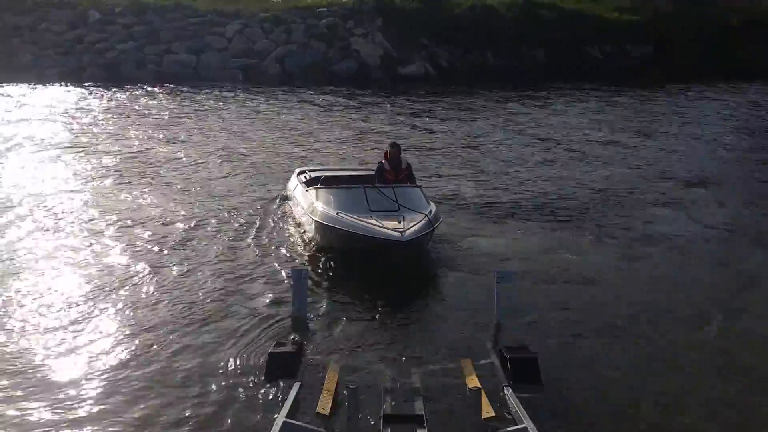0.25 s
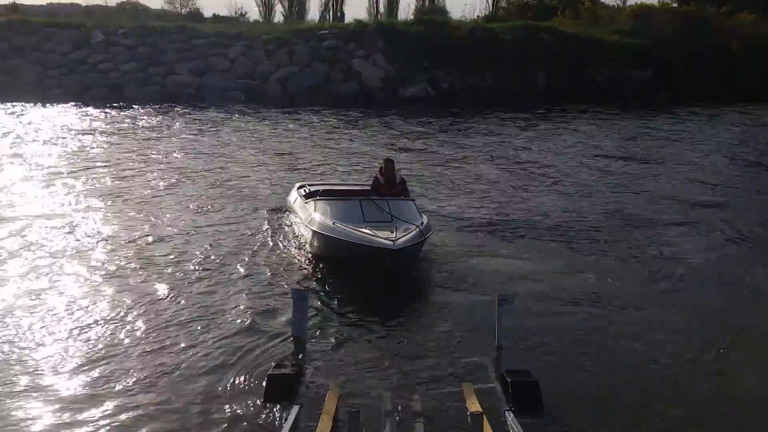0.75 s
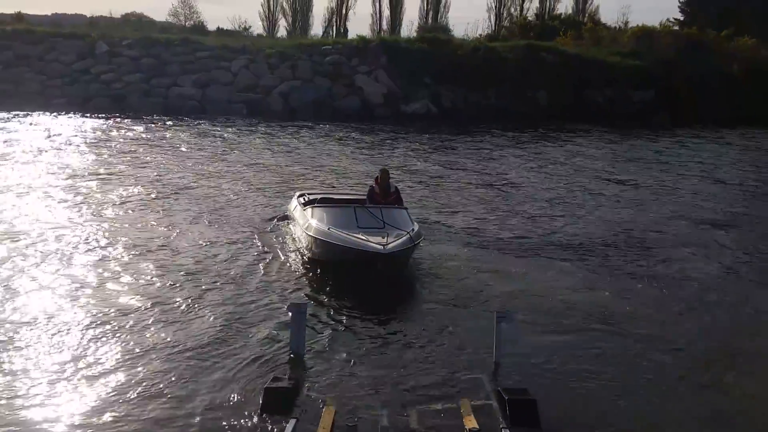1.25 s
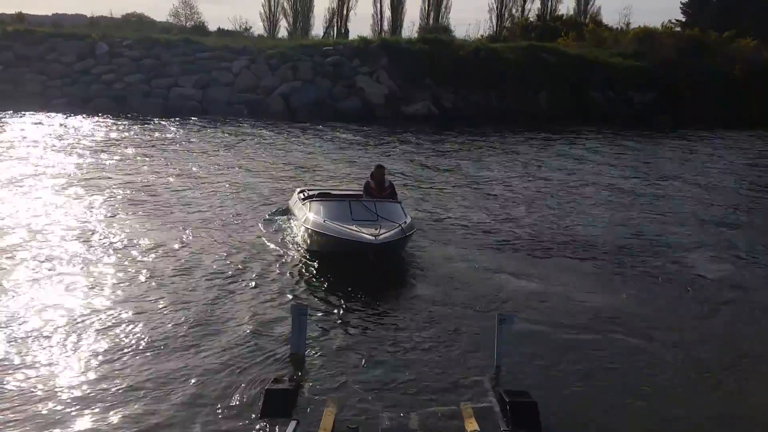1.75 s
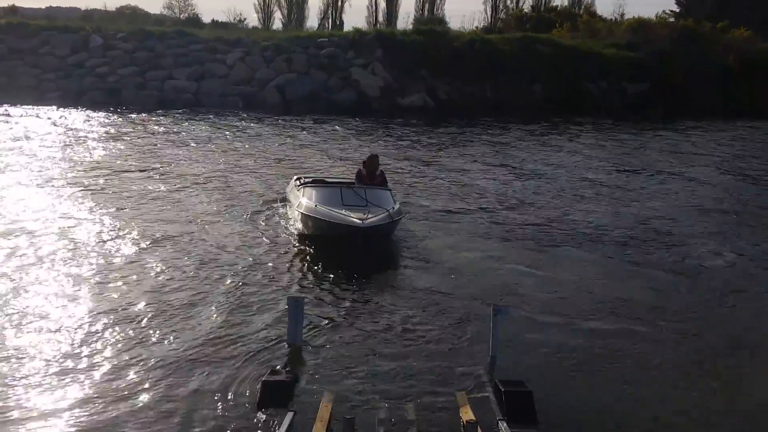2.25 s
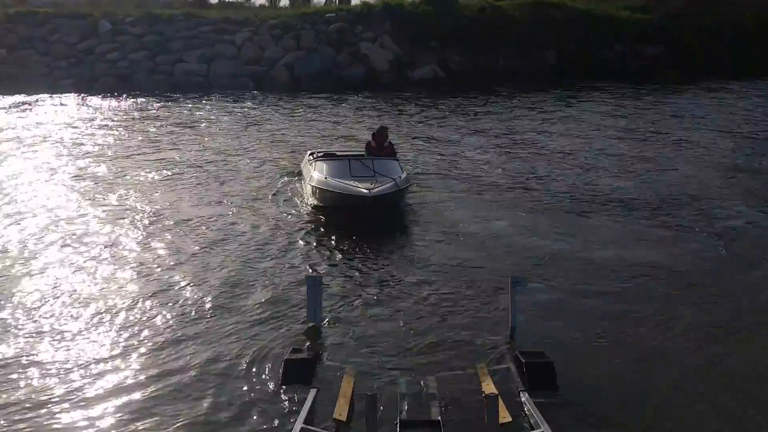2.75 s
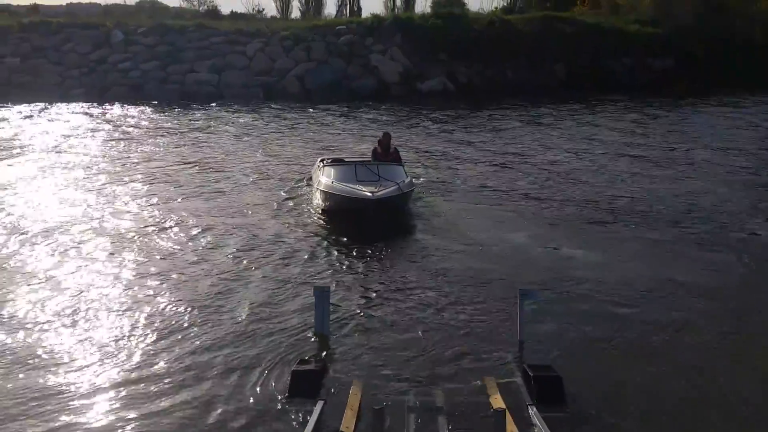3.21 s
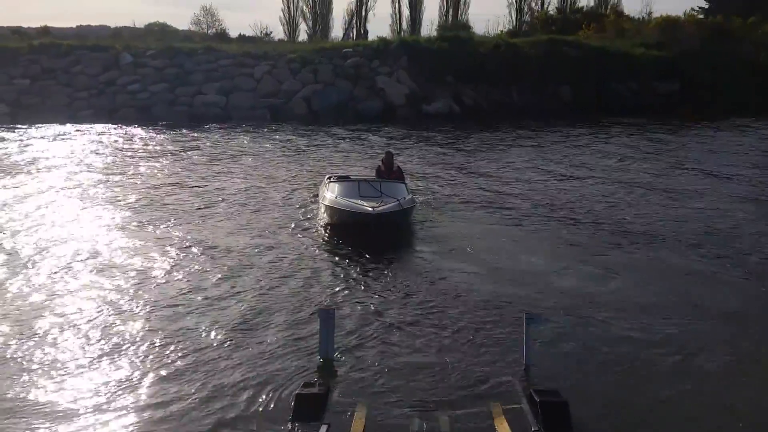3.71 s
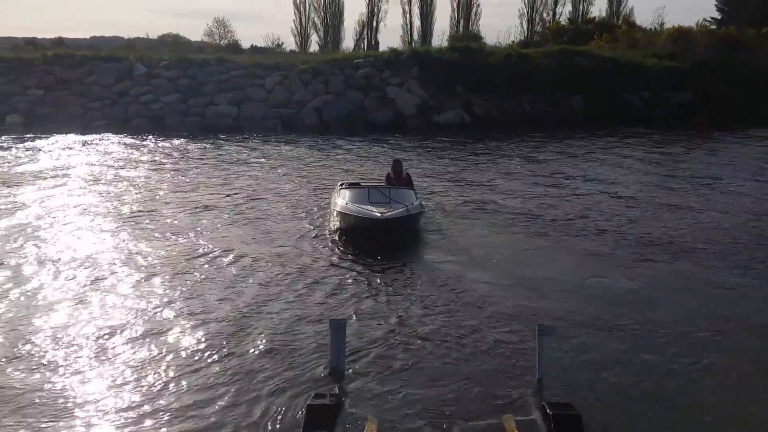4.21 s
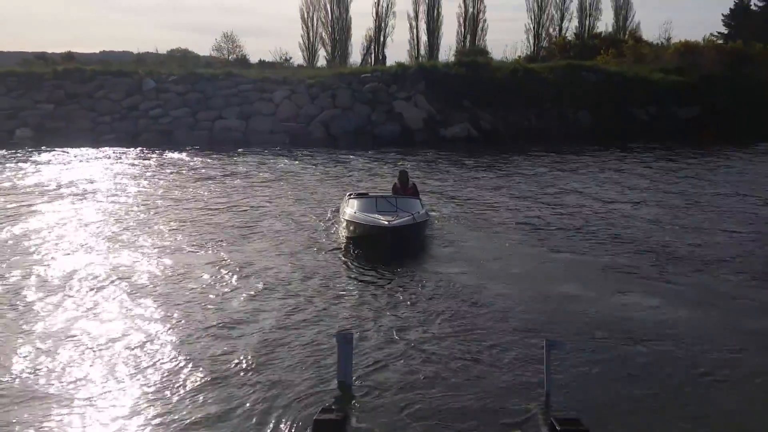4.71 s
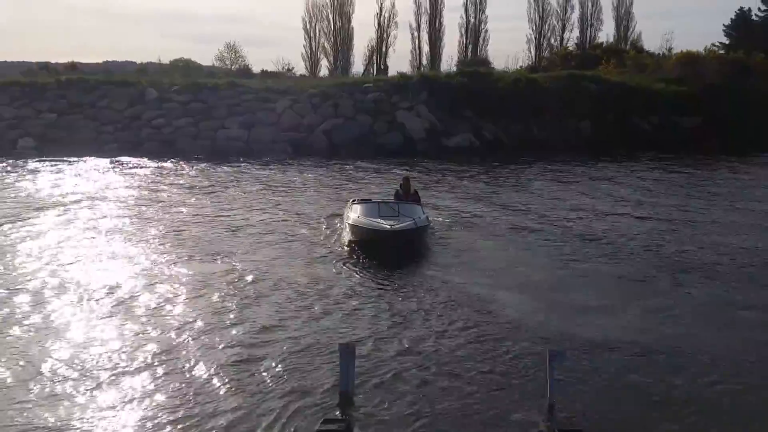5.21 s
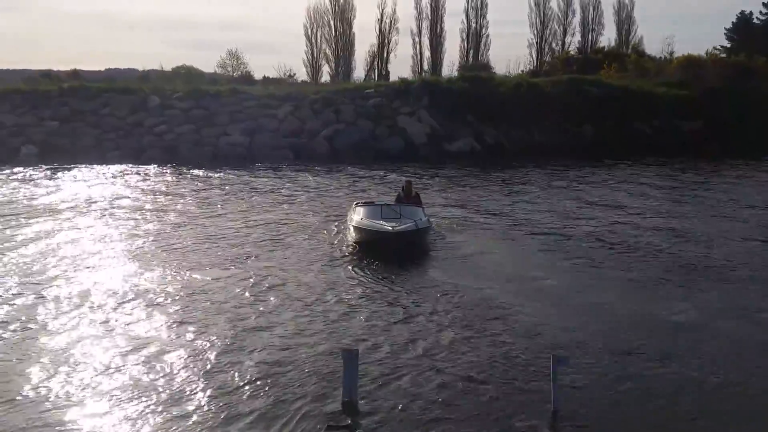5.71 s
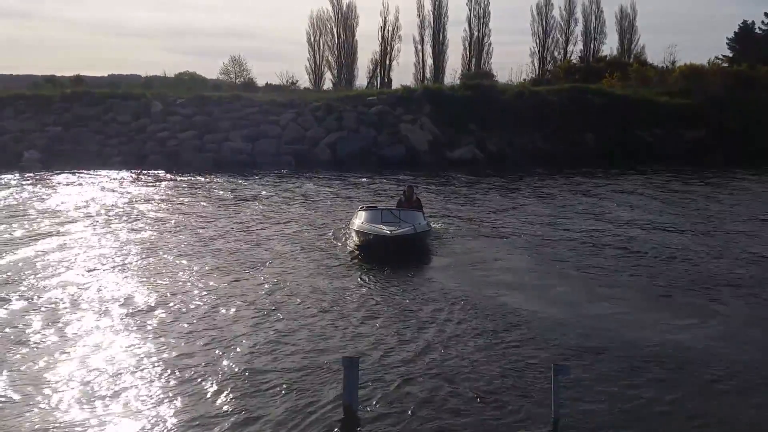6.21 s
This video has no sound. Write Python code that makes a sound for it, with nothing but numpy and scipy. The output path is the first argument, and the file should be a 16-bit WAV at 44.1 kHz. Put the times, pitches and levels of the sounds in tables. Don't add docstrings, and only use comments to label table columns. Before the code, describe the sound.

After a brief silence the sound steps up into a boat engine idling on a river, a low, wet, burbling throb that stays nearly constant. Early finger knocks and rubs strike the camera's sealed case, heaviest near one second. Later come sharp pops on the left and tiny plastic creaks. Soft water and breeze hiss lies beneath, muffled and close to the microphone.

```python
import sys
import numpy as np
from scipy import signal
from scipy.fft import rfft, irfft, next_fast_len
from scipy.io import wavfile
from scipy.ndimage import uniform_filter1d, map_coordinates

SR = 44100
rng = np.random.default_rng(int(sys.argv[2]) if len(sys.argv) > 2 else 0)


def master_out(mix):
    frames = np.transpose(np.atleast_2d(mix))
    ceiling = np.clip(frames, -1, 1)
    pcm = np.round(ceiling * 32767).astype(np.int16)
    wavfile.write(sys.argv[1], SR, pcm)


def voltage_ratio(decibels):
    exponent = np.asarray(decibels, float) / 20
    return 10 ** exponent


N = 284908

# time_s, level_db
GAIN_RISE = [(.128, -18), (0.149, -10.5), (.2, -5), (.25, -2), (.3, 0)]
# time_s, firings_per_s
IDLE_SPEED = [(0.2, 39.2), (1.87, 39.1), (3.16, 39.7), (3.28, 38.9), (5.01, 39.2), (5.13, 37.8),
              (5.31, 39.3), (6.46, 39.1)]
# start_s, length_s, rms_db
PIPE_CLEAR = [(0.725, 0.134, -26.5), (0.902, 0.22, -28), (1.445, 0.118, -31.5), (1.568, 0.44, -27),
              (2.044, 0.18, -27.5), (2.561, 0.045, -28.5), (2.635, 0.14, -28.5), (2.882, 0.12, -26),
              (3.084, 0.062, -27.5), (3.265, 0.026, -30), (3.316, 0.066, -26.5), (3.468, 0.069, -31),
              (3.717, 0.132, -28), (4.186, 0.037, -29), (4.244, 0.048, -29.5), (4.334, 0.31, -27),
              (4.659, 0.04, -27.5), (4.78, 0.16, -27.5), (5.008, 0.114, -26), (5.387, 0.039, -30.5),
              (5.518, 0.042, -29.5), (5.849, 0.068, -28.5), (6.192, 0.27, -29)]
# start_s, length_s, rms_db
HULL_BOOMS = [(0.3, 0.046, -32.5), (0.448, 0.093, -34.5), (0.81, 0.08, -32), (1.019, 0.054, -31.5),
              (1.159, 0.054, -32), (1.327, 0.176, -31), (1.587, 0.039, -33.5), (1.719, 0.13, -31.5),
              (1.908, 0.094, -31), (2.354, 0.066, -31.5), (2.45, 0.064, -33), (2.571, 0.031, -33.5),
              (2.781, 0.116, -33), (3.028, 0.136, -31.5), (3.197, 0.18, -30), (3.405, 0.4, -28.5),
              (3.916, 0.072, -32), (4.012, 0.048, -35), (4.195, 0.28, -30), (4.506, 0.194, -28),
              (4.828, 0.16, -31.5), (5.236, 0.038, -35), (5.303, 0.12, -32), (5.454, 0.08, -31.5),
              (5.572, 0.074, -30), (5.82, 0.16, -30), (6.003, 0.046, -35), (6.18, 0.064, -31.5),
              (6.358, 0.048, -33)]
# start_s, length_s, rms_db
YAW_SECOND = [(0.299, 0.23, -35), (0.658, 0.25, -34.5), (1.049, 0.052, -36), (1.204, 0.151, -36),
              (1.61, 0.18, -37.5), (2.024, 0.23, -35.5), (2.445, 0.045, -35.5), (2.597, 0.42, -34),
              (3.132, 0.185, -33.5), (3.553, 0.7, -37.5), (4.55, 0.15, -39), (4.948, 0.04, -38),
              (5.215, 0.26, -34.5), (5.771, 0.65, -34.5)]
YAW_FOURTH = [(0.297, 0.53, -32.5), (1.008, 0.82, -33.5), (2.133, 0.37, -32.5), (2.956, 0.27, -34),
              (3.885, 0.064, -32.5), (4.034, 0.33, -36), (4.454, 0.32, -34.5), (5.296, 0.21, -33.5)]
YAW_FIFTH = [(0.493, 0.03, -34.5), (0.637, 0.45, -34.5), (1.292, 0.076, -37.5), (1.477, 0.193, -31),
             (1.783, 0.43, -34.5), (2.722, 0.28, -29.5), (3.392, 0.43, -33.5), (3.87, 0.064, -29.5),
             (4.019, 0.13, -32), (4.33, 0.118, -31.5), (4.606, 0.56, -33.5), (5.295, 0.25, -34),
             (6.119, 0.076, -31.5), (6.275, 0.14, -32)]
# multiple, rms_db, drift_db
DRIFTING_LINES = [(1, -46, 3.5), (10, -65, 1.5)]
# multiple, start_s, end_s, rms_db
PASSING_LINES = [
    (14, .75, 1.85, -62),
    (16, 1.1, 3.05, -61),
    (10, 2.45, 2.8, -55),
    (16, 4.4, 5.5, -66),
]
# freq_hz, density_db_per_hz
BURBLE_COLOUR = [(8, -79), (25, -65), (45, -62.5), (120, -58.5), (170, -62.5), (235, -50), (270, -64),
                 (310, -74.5), (420, -85), (700, -88), (1300, -105), (2000, -140)]
# time_s, strength_db
BREEZE_STRENGTH = [(0.3, -78), (0.38, -76.5), (0.49, -69.5), (0.81, -76), (1.19, -75), (1.5, -78),
                   (1.71, -72), (1.88, -78), (2.51, -76.5), (2.82, -78), (5.14, -79), (6.03, -87),
                   (6.32, -88), (6.46, -82)]
# freq_hz, density_db_per_hz
LEFT_NOISE = [(200, -85), (400, -83), (800, -84), (1050, -83), (1300, -93), (1650, -91), (2300, -109),
              (3000, -106), (4300, -102), (5200, -122), (7500, -134)]
RIGHT_NOISE = [(200, -88), (400, -85.5), (650, -81), (900, -96), (1400, -98), (1750, -96), (2300, -108),
               (3300, -101), (4300, -107), (5000, -118), (7500, -133)]
# centre_hz, width_hz, level_db
LEFT_CAVITY = (3290, 434, 15.13)
# freq_hz, density_db_per_hz
TOP_HISS = [(6000, -140), (8500, -132), (10500, -125), (12800, -111), (15700, -107), (15850, -150)]
# peak_s, signed_push, left_ring_db, right_ring_db, snap_db
CASE_KNOCKS = [(.2406, .17, -40, -44, -75), (.2945, .03, -38, -42, -75), (.4496, -.17, -8, -16, -36),
               (.4513, .13, -30, -30, -60), (.5953, .018, -22, -29, -60), (.9885, .01, -34, -36, -55),
               (1.0037, .025, -20, -31, -58), (1.0141, .126, -11, -22, -62), (1.018, -.224, -24, -22, -65),
               (1.024, .224, -22, -24, -60), (1.0388, -.316, -24, -24, -41), (1.0417, .53, -12, -17, -35),
               (1.046, .09, -22, -26, -49), (2.7096, -.14, -21, -31, -66), (2.712, .07, -32, -34, -75),
               (2.7222, -.09, -42, -42, -75), (2.7318, -.03, -26, -24, -51), (2.7335, .04, -26, -32, -70)]
# centre_hz, width_hz, level_db
LEFT_MODES = [(620, 43, 0), (934, 253, 3.5), (1143, 220, 4.5), (1410, 200, -3)]
RIGHT_MODES = [(580, 180, 0), (950, 300, -10), (1800, 600, -13)]
# centre_hz, width_hz, level_db
WALL_MODES = [(3600, 1300, 5), (8000, 3200, -7), (14800, 4000, 1)]
# start_s, rise_s, hold_s, body_db, fizz_db (at end of hold)
FINGER_SCRAPES = [
    (.28, .04, .12, -57, -99),
    (.445, .008, .078, -31, -66),
    (.574, .006, .055, -51, -84),
    (.587, .01, .001, -39, -77),
    (1.012, .005, .026, -34, -72),
    (1.033, .009, .003, -45, -57),
    (2.84, .045, .001, -56, -94),
]
# time_s, level_db, pitch_hz
CREAKS = [(0.926, -53, 13030), (.943, -58, 12330), (1.761, -46.5, 14400), (2.707, -68.5, 6940),
          (2.7323, -59.5, 8550), (2.768, -45, 8063), (5.4715, -43, 13630), (6.057, -56, 2500)]
# time_s, step_db, edge_db
MEMBRANE_POPS = [(1.64475, -7.1, -22), (1.68598, -6.1, -22), (1.71117, -12.2, -18), (4.0845, -9.9, -24),
                 (5.40192, .6, -30), (5.46061, .3, -23), (5.47129, -8, -20), (5.47546, -6.5, -19),
                 (5.47632, -.4, -22)]

DROWNED_PIPE_DB, QUIET_HULL_DB, BEHIND_DB = -40, -40, -43
SWELL_S = 0.03
WASH_FOLLOWS_BREEZE = 0.34
SCRAPE_EDGE_DB, SCRAPE_SAG_DB, FIZZ_GROWTH_DB = 17, 9, 6
GAIN_STEP_S = .01


def unit(x):
    return x / np.sqrt(np.mean(x ** 2) + 1e-20)


def along(points, hz):
    f, v = np.transpose(points)
    return np.interp(np.log(hz + 1), np.log(f + 1), v)


def curve(rows):
    s, value = np.transpose(rows)
    return np.interp(np.arange(N) / SR, s, value)


def wobble(knots_per_s):
    knots = rng.standard_normal(int(N * 40 / SR) + 4)
    return map_coordinates(knots, [np.arange(N) * np.clip(knots_per_s, .1, 39) / SR])


def filtered(x, response):
    m = next_fast_len(N + SR // 2)
    return irfft(rfft(x, m) * response(np.fft.rfftfreq(m, 1 / SR)), m)[..., :N]


def peak(hz, centre_hz, width_hz):
    return 1j * hz * width_hz / (centre_hz ** 2 - hz ** 2 + 1j * hz * width_hz)


def knee(hz, corner_hz):
    return 1 / (1 + 1.3j * hz / corner_hz - (hz / corner_hz) ** 2)


def spikes(times_s, sizes):
    return np.bincount(np.round(np.asarray(times_s) * SR).astype(int), sizes, N)[:N]


def spells(rows, rest_db):
    t = np.arange(N) / SR
    levels = []
    for start_s, length_s, db in rows:
        inside_s = np.minimum(t - start_s, start_s + length_s - t)
        levels.append((db - rest_db) * np.clip(inside_s / SWELL_S + .5, 0, 1))
    return rest_db + np.max(levels, axis=0)


def firing_line(turns, multiple, rms_db):
    wander = (.25 + .11 * multiple) * wobble(16) + rng.uniform(0, 2 * np.pi)
    return voltage_ratio(rms_db) * np.sqrt(2) * np.cos(2 * np.pi * multiple * turns + wander)


def firing_lines(turns, pipe_db, hull_db):
    t = np.arange(N) / SR
    lines = firing_line(turns, 6, pipe_db - .6 + 0.96 * wobble(12))
    lines += firing_line(turns, 3, hull_db - .7 + 1.5 * wobble(15))
    for multiple, rows in [(2, YAW_SECOND), (4, YAW_FOURTH), (5, YAW_FIFTH)]:
        lines += firing_line(turns, multiple, spells(rows, BEHIND_DB) - .8 + 1.5 * wobble(8.1))
    for multiple, db, drift_db in DRIFTING_LINES:
        lines += firing_line(turns, round(multiple), db + drift_db * wobble(5.0))
    for multiple, start_s, end_s, db in PASSING_LINES:
        fade = np.clip(np.minimum(t - start_s, end_s - t) / 0.032, 0, 1)
        lines += fade * firing_line(turns, round(multiple), db + 4.3 * wobble(7))
    return lines


def exhaust_burble(turns, pipe_db, hull_db):
    puff = 0.95 + np.exp(-4.5 * (turns % 1))
    gulp = (voltage_ratio(pipe_db) + voltage_ratio(hull_db) + voltage_ratio(-27.5)) ** .8 * voltage_ratio(1.7 * wobble(6))
    noise = unit(puff * gulp * rng.standard_normal(N))
    return filtered(noise, lambda hz: voltage_ratio(along(BURBLE_COLOUR, hz)) * np.sqrt(SR / 2))


def engine():
    turns = np.cumsum(curve(IDLE_SPEED)) / SR
    pipe_db = spells(PIPE_CLEAR, DROWNED_PIPE_DB)
    hull_db = spells(HULL_BOOMS, QUIET_HULL_DB)
    sound = firing_lines(turns, pipe_db, hull_db) + exhaust_burble(turns, pipe_db, hull_db)

    def ports(hz):
        half_lag_rad = .06 + np.pi * hz * .00017
        return voltage_ratio([[-1.3], [1.2]]) * np.exp(np.array([[1j], [-1j]]) * half_lag_rad)

    return filtered(sound, ports)


def river():
    breeze_db = curve(BREEZE_STRENGTH)
    breeze_db = breeze_db - breeze_db.mean()
    z = signal.stft(rng.standard_normal((4, N)), nperseg=512)[2]
    patches = uniform_filter1d(rng.standard_normal(z.shape), 8, axis=1)
    patches = uniform_filter1d(patches, 10, axis=2)
    noise = signal.istft(z * voltage_ratio(1.7 * unit(patches)), nperseg=512)[1][:, :N] * np.sqrt(SR / 2)
    ring_hz, width_hz, ring_db = LEFT_CAVITY

    def ports(hz):
        cavity = abs(1 + voltage_ratio(ring_db) * peak(hz, ring_hz, width_hz) ** 2)
        return [voltage_ratio(along(LEFT_NOISE, hz)) * cavity, voltage_ratio(along(RIGHT_NOISE, hz))]

    wash = voltage_ratio(WASH_FOLLOWS_BREEZE * breeze_db) * filtered(noise[:2], ports)
    return wash + voltage_ratio(breeze_db) * filtered(noise[2:], lambda hz: voltage_ratio(along(TOP_HISS, hz)))


def case(hz, modes):
    ring = sum(voltage_ratio(db) * peak(hz, c, w) for c, w, db in modes)
    return ring * knee(hz, 2400) / (1 + 1j * hz / 1600) ** 2 * 1.5


def thin_wall(hz):
    return sum(voltage_ratio(db) * peak(hz, c, w) ** 2 for c, w, db in WALL_MODES)


def struck(times_s, sizes, response):
    one = irfft(response(np.fft.rfftfreq(4096, 1 / SR)))
    return np.roll(filtered(spikes(times_s, sizes), response), -np.argmax(one)) / np.max(one)


def knocks():
    s, push, left_db, right_db, snap_db = np.transpose(CASE_KNOCKS)
    sign = np.sign(push)
    thud = struck(s, push, lambda hz: peak(hz, 130, 300) * knee(hz, 440) ** 2)
    left = struck(s, sign * voltage_ratio(left_db), lambda hz: case(hz, LEFT_MODES) * knee(hz, 1500))
    right = struck(s, sign * voltage_ratio(right_db), lambda hz: case(hz, RIGHT_MODES))
    snap = struck(s, voltage_ratio(snap_db + 7.5), thin_wall)
    return np.array([thud + snap + left, np.roll(.85 * thud + .9 * snap + right, 14)])


def strokes():
    s, rise_s, hold_s, body_db, fizz_db = np.transpose(FINGER_SCRAPES)[..., None]
    u = np.arange(N) / SR - s - rise_s
    edge_db = -SCRAPE_EDGE_DB * np.clip(np.maximum(-u, u - hold_s), 0, None) / rise_s
    done = np.clip(u / hold_s, 0, 1)
    on, long = u > -rise_s, hold_s > rise_s
    body = on * voltage_ratio(body_db + edge_db - long * SCRAPE_SAG_DB * done)
    fizz = on * voltage_ratio(fizz_db + edge_db - long * FIZZ_GROWTH_DB * (1 - done))
    return body.sum(0), fizz.sum(0)


def scrapes():
    body, fizz = strokes()
    slips = rng.standard_normal((5, N))
    lumps = voltage_ratio(2.6 * map_coordinates(rng.standard_normal(N // 128 + 4), [np.arange(N) / 128]))
    right_slips = 0.48 * np.roll(slips[0], 12) + 0.62 * slips[1]
    rub = body * lumps * [voltage_ratio(18.5) * slips[0], voltage_ratio(22.5) * right_slips]
    rub = filtered(rub, lambda hz: [case(hz, LEFT_MODES) * knee(hz, 2200),
                                    case(hz, RIGHT_MODES) / (1 + 1j * hz / 1500)])
    shove = filtered(voltage_ratio(14.5) * body * slips[2], lambda hz: peak(hz, 120, 220) * knee(hz, 260))
    return rub + shove + filtered(voltage_ratio(14.5) * fizz * slips[3:], thin_wall)


def creaks():
    out, t = np.zeros((2, N + 512)), np.arange(512) / SR
    for s, db, hz in CREAKS:
        envelope = voltage_ratio(db - 60 * t / 0.0065) * (1 - np.exp(-t / .0004))
        burst = rng.standard_normal((2, 512)) * envelope * [[1], [.6]]
        band_hz = [.85 * hz, min(1.15 * hz, 15800)]
        sos = signal.butter(2, band_hz, "band", fs=SR, output="sos")
        out[:, round(s * SR):][:, :512] += signal.sosfilt(sos, burst)
    return out[:, :N]


def pops():
    s, db, edge_db = np.transpose(MEMBRANE_POPS)

    def leak(hz):
        return SR / (2 * np.pi * 128) * peak(hz, 97, 128) * knee(hz, 1800) / (1 + 1j * hz / 1640)

    def cavity(hz):
        return 1 + 1.7 * peak(hz, 3450, 1200) ** 2

    def edge(hz):
        return 1.3 * peak(hz, 14500, 9000) ** 2 + 1.1 * peak(hz, 5000, 3000) ** 2

    step = filtered(spikes(s, voltage_ratio(db)), lambda hz: leak(hz) * cavity(hz))
    return (step + filtered(spikes(s, voltage_ratio(db + edge_db)), edge)) * [[1], [0]]


def scene():
    return engine() + river() + knocks() + scrapes() + creaks() + pops()


def band_limit(x):
    return signal.sosfilt(signal.butter(12, 16860, fs=SR, output="sos"), x)


def record(dry):
    t = np.arange(N) / SR
    s, db = np.transpose(GAIN_RISE)
    step_s = s[0] + np.floor((t - s[0]) / GAIN_STEP_S) * GAIN_STEP_S
    gain = voltage_ratio(np.interp(step_s, s, db)) * (t >= s[0])
    mix = filtered(dry * gain, lambda hz: np.clip((16800 - hz) / 900, 0, 1))
    return band_limit(mix)


dry = scene()
out = record(dry)
master_out(out)
```